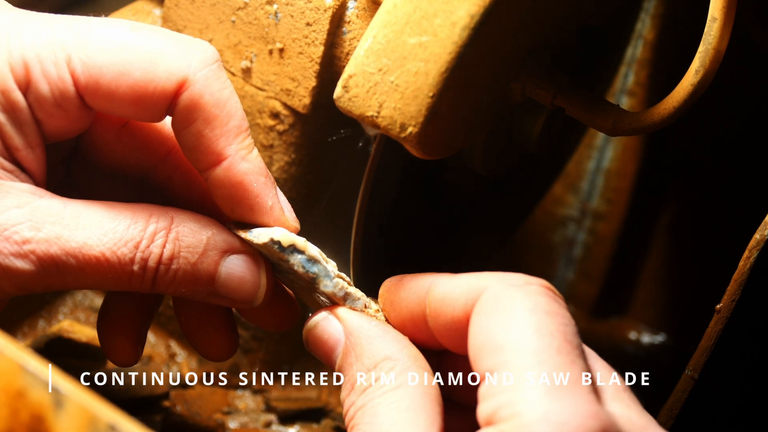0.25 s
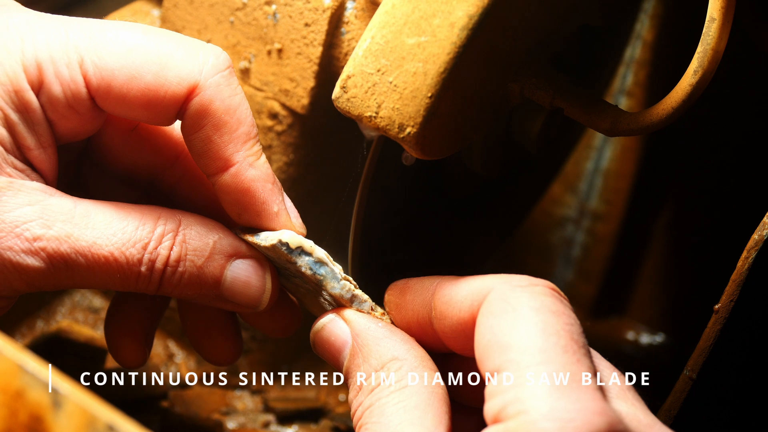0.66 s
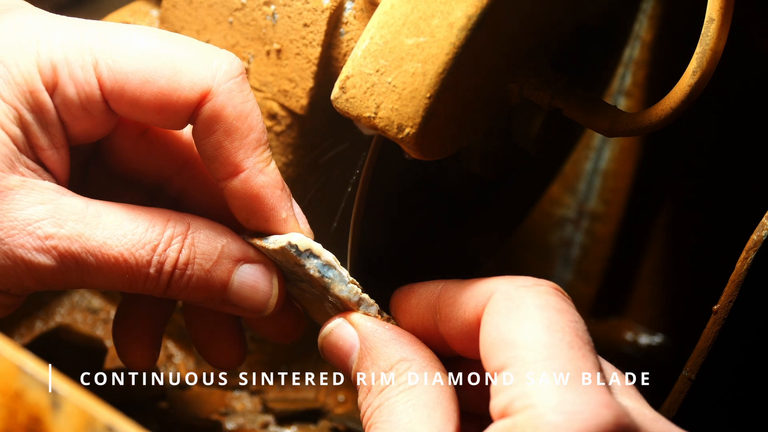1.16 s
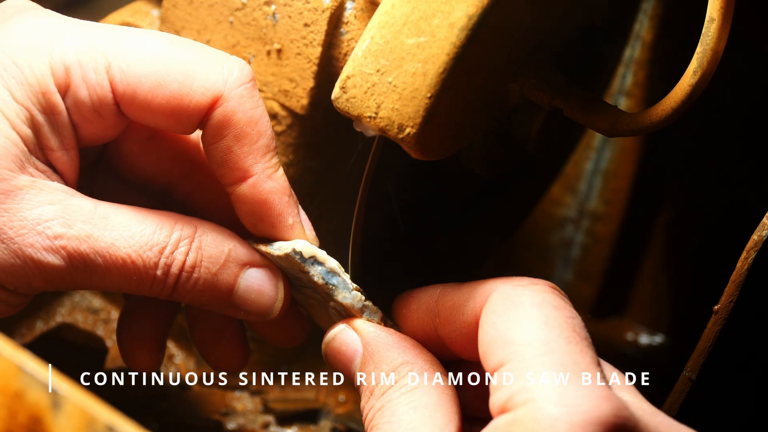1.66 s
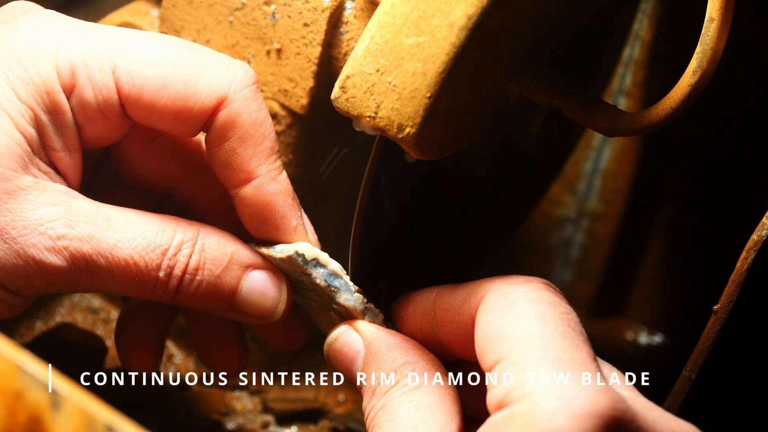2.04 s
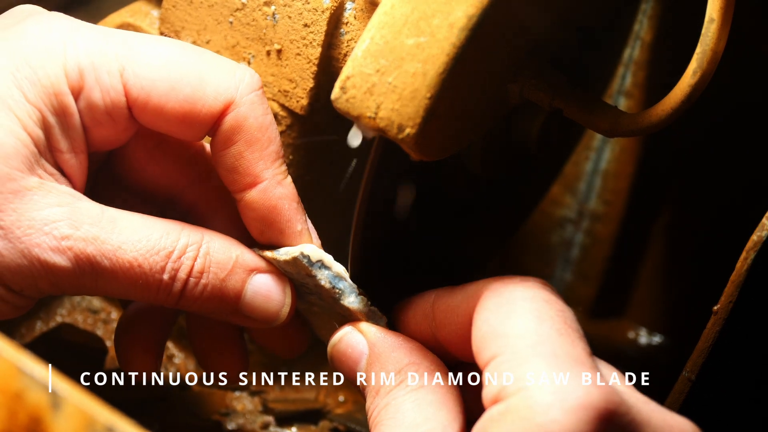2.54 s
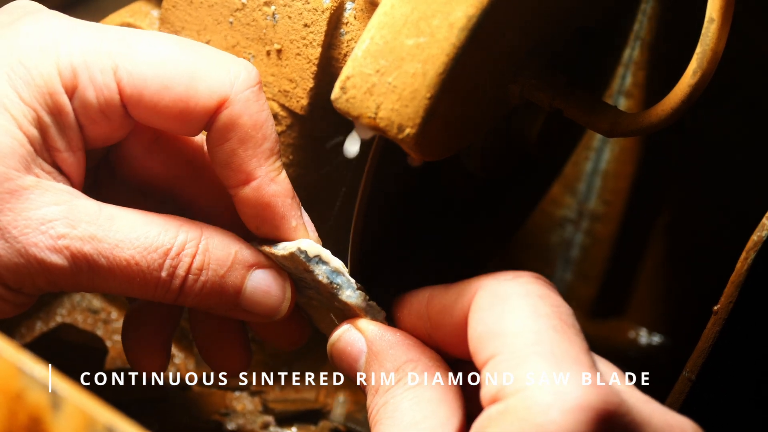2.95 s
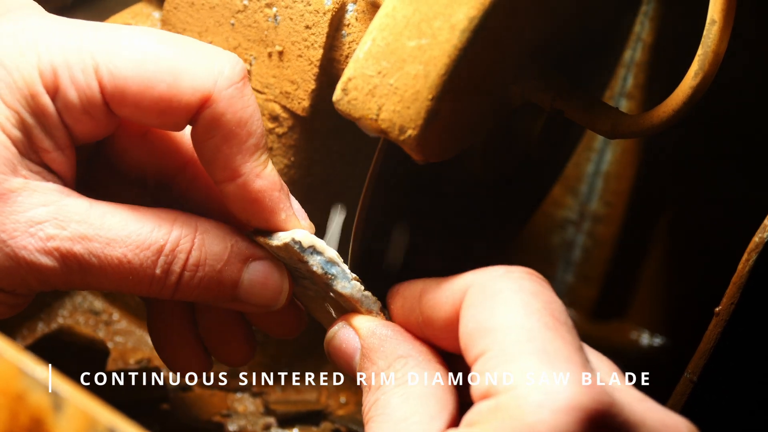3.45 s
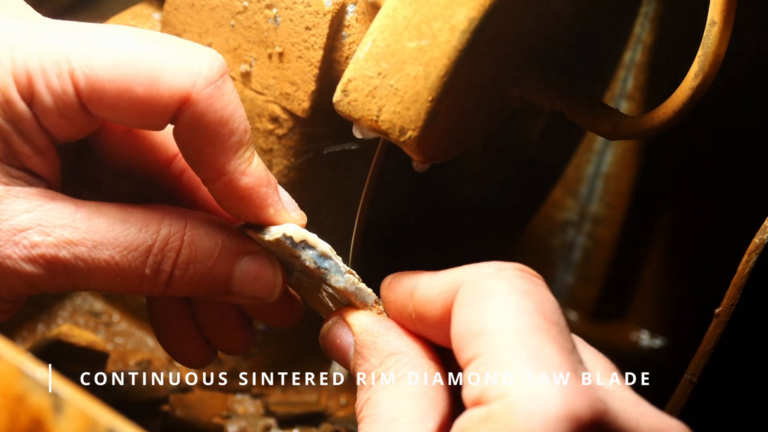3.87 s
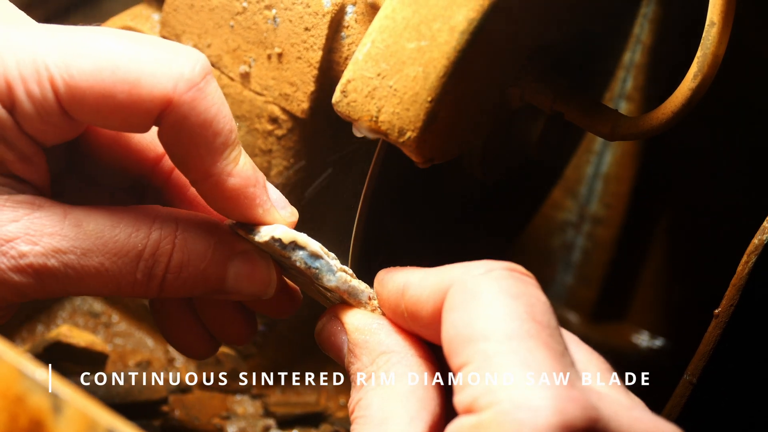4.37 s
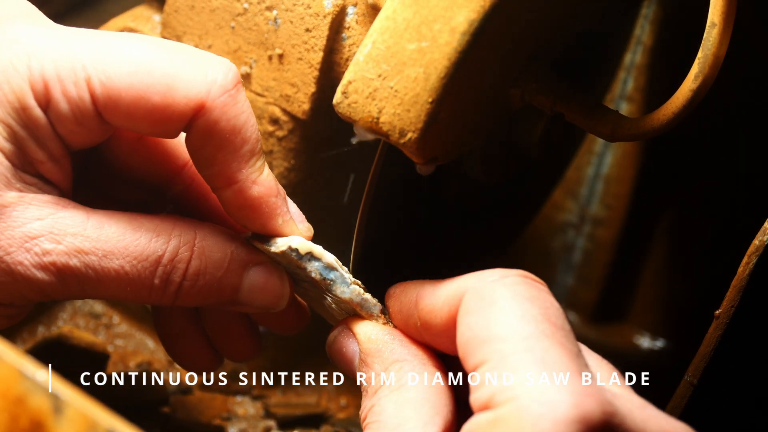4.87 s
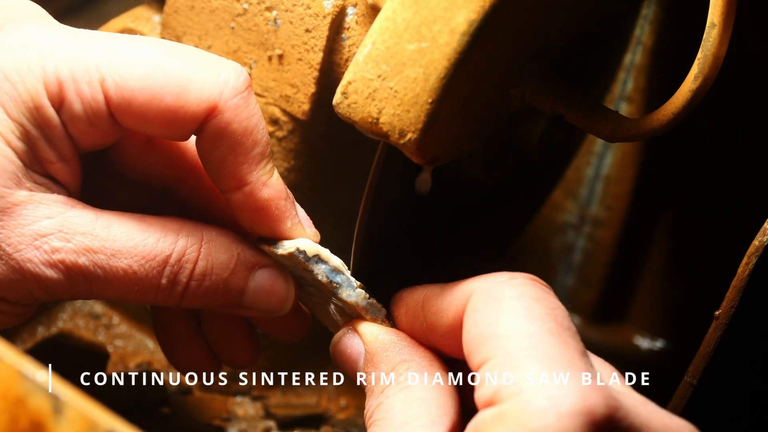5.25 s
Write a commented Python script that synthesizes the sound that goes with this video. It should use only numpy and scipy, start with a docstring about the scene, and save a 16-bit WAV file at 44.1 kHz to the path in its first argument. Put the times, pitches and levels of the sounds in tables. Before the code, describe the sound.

Close, continuous gritty grinding of a wet saw blade cutting stone, with short high squeals and chattering tones.

```python
"""A diamond saw grinds a small hand-held stone, close to a pair of microphones in a small workshop.
The wet rim turns about 79 times a second; its grit scrapes a slowly wearing pattern each turn and loose
chips add fresh hiss. A harder feed is louder and brighter. In spells a blade mode sings, or the stone
bounces and chatters at multiples of the shaft speed; the rim squeals as it bites, and later the
skipping stone knocks the blade. Motor hum and room rumble lie underneath."""
import sys
import numpy as np
from scipy import signal
from scipy.fft import rfft, irfft
from scipy.io import wavfile
from scipy.ndimage import uniform_filter1d, map_coordinates

SR = 44100
rng = np.random.default_rng(int(sys.argv[2]) if len(sys.argv) > 2 else 0)


def unload_audio(sound):
    """Save the sound as a 16-bit wav file, at the path given as the first command line argument."""
    columns = np.transpose(np.atleast_2d(sound))
    # keep every value between -1 and 1, then stretch to whole-number steps
    steps = np.round(np.clip(columns, -1, 1) * 32767)
    wavfile.write(sys.argv[1], SR, steps.astype(np.int16))


N = 242991
TIME = np.arange(N) / SR
FREQ = np.maximum(np.arange(N // 2 + 1) * SR / N, 1)

# Borders in Hz between the saw's five bands: bench and guard, blade bending, rasp, rim screech, hiss.
BAND_EDGES_HZ = [1420, 2360, 4850, 7180]


def undb(db):
    """Decibels to gain."""
    return 10 ** (np.asarray(db) / 20)


def unit(x):
    """Scale to rms 1."""
    return x / np.sqrt(np.mean(x ** 2))


def steady(x):
    """Scale to rms 1 over every tenth of a second, keeping the fast grain."""
    return x / np.sqrt(uniform_filter1d(x ** 2, size=SR // 10))


def curve(points):
    """One value per sample from (seconds, value) points."""
    return np.interp(TIME, *np.transpose(points))


def colour(points):
    """Gain at every frequency from (Hz, dB) points."""
    hz, db = np.transpose(points)
    return undb(np.interp(np.log(FREQ), np.log(hz), db))


def shape(x, gain):
    """Filter by a gain per frequency."""
    return irfft(rfft(x) * gain, N)


def walk(rate_hz):
    """Smooth random drift of rms 1, reaching up to about rate_hz."""
    return unit(shape(rng.standard_normal(N), np.exp(-(FREQ / rate_hz) ** 2)))


def rim_grit(turns, life_turns, sign=1):
    """Grit passes the stone each turn and wears into a new pattern; a negative sign flips it each turn."""
    cells = 560
    kept = np.exp(-1 / life_turns)
    carry = sign * kept
    grit = rng.standard_normal((int(turns[-1]) + 2, cells))
    worn, _ = signal.lfilter([np.sqrt(1 - kept ** 2)], [1, -carry], grit[1:], axis=0, zi=carry * grit[:1])
    return unit(map_coordinates(worn.ravel(), [turns * cells], order=3, mode="nearest"))


def cutting_force(turns, repeat, life_turns, wobble, flutter_db):
    """Rim grit and fresh chips push on the stone, pulsing once a turn as the blade runs out of true."""
    # Each row: time in seconds, share of the pattern that flips on alternate turns as the stone rocks.
    rocking = [(0, 0.05), (2.2, 0), (2.55, 0.27), (2.85, 0.18), (3.2, 0), (4.6, 0.03), (5.5, 0.22)]
    rock = curve(rocking)
    spot = turns + 0.00036 * walk(25)  # the point of contact trembles along the rim
    pattern = np.sqrt(1 - rock) * rim_grit(spot, life_turns)
    pattern += np.sqrt(rock) * rim_grit(spot, life_turns, sign=-0.98)
    force = np.sqrt(repeat) * pattern + np.sqrt(1 - repeat) * rng.standard_normal(N)
    # the high spot never presses twice alike, and creeps round the rim as the stone shifts
    depth = wobble * (1 + 0.5 * walk(35))
    press = 1 + depth * np.cos(2 * np.pi * turns + walk(3.2))
    return force * press * undb(flutter_db * walk(42))


def saw_response():
    """Stone, blade and guard resonate above a broad scrape, with gaps where neighbouring modes cancel."""
    # Each row: frequency in Hz, gain of the broad scrape in dB.
    scrape = [(30, -78), (85, -70), (150, -35.5), (320, -37), (400, -13), (500, -12.5), (700, -6),
              (1350, -9.5), (1650, -5.5), (2500, -11), (3800, -5.5), (4750, -9.5), (6400, -7), (9300, -13),
              (12300, -14), (15000, -23.5)]
    # Each row of both: centre in Hz, width in Hz, gain in dB.
    modes = [(855, 79, -5), (1126, 37, -6.5), (1883, 60, -1.5), (2680, 41, -4), (2980, 34, -11),
             (3556, 370, -2.5), (4360, 130, -11), (5200, 65, -7.5), (5760, 79, -4), (6155, 160, -2),
             (6480, 85, 0.5), (6870, 105, -2), (7860, 100, -9), (8510, 260, -4.5), (8950, 120, -7),
             (9210, 180, -1.5), (9670, 250, -4.5), (9870, 180, -2.5), (10100, 150, -10), (10770, 220, -8.5),
             (11750, 170, -11.5), (12800, 170, -8.5), (13800, 170, -11.5)]
    gaps = [(1380, 47, -2.5), (2430, 270, -2), (2850, 62, -2), (4840, 125, -3), (12570, 210, -5)]
    power = colour(scrape) ** 2
    bass_loss = 1 + (380 / FREQ) ** 8  # small parts radiate almost no bass
    for hz, width, db in modes:
        detuning = (FREQ / hz - hz / FREQ) * hz / width
        power += undb(db) ** 2 / (1 + detuning ** 2) / bass_loss
    gaps_db = sum(db * np.exp(-((FREQ - hz) / width) ** 2) for hz, width, db in gaps)
    return np.sqrt(power) * undb(gaps_db)


def grinding(turns, repeat, force, flicker_db):
    """The cutting force rings the saw in five bands; the brighter ones gain most as the feed grows."""
    # Each row: time in seconds, how hard the hand feeds the stone in dB.
    feed = [(0.0, -45.5), (0.1, -40), (0.33, -36.5), (0.66, -36), (0.82, -35), (1.41, -35), (1.67, -32.5),
            (1.81, -35.5), (2.17, -34.5), (2.26, -36), (2.86, -35), (2.94, -37), (3.055, -36.5),
            (3.085, -38.5), (3.165, -39), (3.185, -36), (3.27, -36.5), (3.54, -33.5), (3.8, -35.5),
            (4.01, -38), (4.58, -38.5), (4.7, -36.5), (5.0, -37), (5.45, -40.5)]
    # Each row: time in seconds, level of bench and guard in dB before bench_lift_db is added.
    bench = [(0, -59), (0.45, -55), (1.2, -54.5), (1.5, -51.5), (2.0, -54), (2.75, -53), (3.3, -54),
             (4.2, -58.5), (5.0, -53), (5.5, -54.5)]
    # The four upper bands. Each row: level in dB at the usual feed, dB gained per dB of feed.
    blade_bands = [(-46, 0.5), (-43.5, 0.71), (-40.5, 1.0), (-38.5, 1.12)]
    usual_feed_db, bench_lift_db, spray_share = -35, 6, 0.13
    # heavy parts follow the rim most faithfully, the hiss of water and slurry least
    heavy = cutting_force(turns, repeat + 0.067, life_turns=17.2, wobble=0.035, flutter_db=0.5)
    wet = np.sqrt(1 - spray_share) * force + np.sqrt(spray_share) * rng.standard_normal(N)
    highpass = [1] + [1 / (1 + (hz / FREQ) ** 20) for hz in BAND_EDGES_HZ] + [0]
    feed_db = curve(feed) - usual_feed_db
    levels = [curve(bench) + bench_lift_db] + [db + growth * feed_db for db, growth in blade_bands]
    response, out = saw_response(), 0
    for k, (drive, db) in enumerate(zip([heavy, force, force, force, wet], levels)):
        band = steady(shape(drive, response * (highpass[k] - highpass[k + 1])))
        # each part takes up the force a little differently as the stone shifts
        out += band * undb(db + flicker_db * walk(14.6))
    return out


def treble_shimmer(x, depth_db, span_hz, hold_s):
    """Narrow patches of the treble swell and fade on their own."""
    hz, s, bands = signal.stft(x, SR, nperseg=1024)
    grid = np.meshgrid(hz / span_hz, s / hold_s, indexing="ij")
    patches = map_coordinates(rng.standard_normal((400, 200)), grid, order=3, mode="mirror")
    gain = undb(depth_db * patches * (hz > BAND_EDGES_HZ[1])[:, None])
    gain /= np.sqrt(np.mean(gain ** 2, axis=1, keepdims=True))
    return signal.istft(bands * gain, SR, nperseg=1024)[1][:N]


def blade_singing(force, fade_s):
    """Friction feeds a blade mode for a while; it swells to a steady size and dies away."""
    # Each row: start and end in seconds, pitch in Hz, width in Hz, held level in dB.
    spells = [ (0.0, 1.394, 1850, 265, -52.5), (0.046, 1.473, 11880, 130, -53), (0.08, 0.7, 6280, 400, -53),
              (0.083, 0.67, 3460, 110, -50.5), (0.043, 1.013, 4240, 129.9, -53),
              (0.676, 1, 3620, 170, -45.5), (.8, 1.8, 6600, 120, -52), (1.37, 1.749, 5150, 60, -49.5),
              (1.4, 2.3, 10650, 900, -53), (1.53, 1.793, 3530, 200, -52), (1.6, 2.26, 9600, 700, -47.5),
              (1.696, 2.96, 8560, 500, -51), (1.75, 2.076, 1663, 25.2, -50.5), (1.86, 2.457, 5540, 51, -55),
              (1.987, 2.226, 3480, 72, -43.5), (1.99, 2.35, 3020, 97.2, -57),
              (2.15, 2.905, 6570, 260, -52.5), (3.185, 3.738, 3386, 42.3, -50.5),
              (3.14, 3.89, 5745, 28, -53), (3.398, 3.857, 12920, 238, -56.5), (3.306, 3.8, 7290, 120, -52),
              (3.3, 4.348, 1490, 207.1, -51), (3.55, 3.982, 3670, 252, -55), (3.656, 3.954, 2680, 60, -55),
              (3.91, 4.65, 9260, 130, -57), (4.37, 4.816, 3810, 171, -54), (4.42, 4.849, 3580, 200, -54),
              (4.6, 5.7, 1760, 601, -57.5), (4.553, 4.9, 6150, 422, -43), (4.89, 5.357, 3385, 110, -51.5),
              (4.805, 5.594, 2290, 326, -59)]
    out = np.zeros(N)
    for start, end, hz, width, db in spells:
        now = (TIME > start) & (TIME < end)
        pole = np.exp((2j * np.pi * hz - np.pi * width) / SR)
        ring = signal.lfilter([1], np.poly([pole, pole]), force[now])
        ring /= np.sqrt(uniform_filter1d(np.abs(ring) ** 2, size=1500))
        to_edge_s = np.minimum(TIME[now] - start, end - TIME[now])
        out[now] += undb(db) * np.minimum(to_edge_s / fade_s, 1) * unit(ring.real)
    return out


def motor_hum(turns, waver_db, magnet_db):
    """The drive hums on multiples of the shaft speed, with a magnetic tone at eight times the mains."""
    # Each row: multiple of the shaft speed, level in dB.
    harmonics = [(2, -92.5), (3, -94.5), (6, -82.5)]
    mains_hz, hum = 50, 0
    for order, db in harmonics:
        gain = undb(db + waver_db * walk(5.2))
        hum += gain * unit(np.sin(2 * np.pi * order * turns + 0.5 * walk(41)))
    magnet = unit(np.sin(2 * np.pi * 8 * mains_hz * TIME) * undb(2 * walk(41)))
    return hum + undb(magnet_db) * magnet


def bounce_strength(tone_hz):
    """Each spell of bouncing lifts a chatter tone near the held stone's resonance, then lets it fall."""
    # Each row: start and end in seconds, resonance in Hz, relative peak level in dB.
    # A row sounds only if its end lies after its start.
    spells = [ (0.0, 0.26, 1850, -51.5), (0.05, 0.66, 804, -55.5), (0.233, 0.38, 1900, -42),
              (0.257, 0.3, 868, -56), (0.375, 0.72, 1910, -52), (0.399, 2.1, 515, -53),
              (0.502, 1.404, 1914, -53), (0.618, 2.06, 807, -47), (0.732, 0.89, 1860, -61),
              (0.992, 1.38, 1890, -45.5), (1.29, 1.2, 834, -49), (1.33, 1.5, 1895, -53),
              (1.442, 1.5, 830, -52), (1.48, 1.58, 1870, -46), (1.647, 1.71, 1870, -42),
              (1.728, 1.815, 1885, -48), (1.82, 1.6, 1910, -55), (1.9, 2.6, 1950, -51.5),
              (1.942, 2.11, 1877, -46.5), (2.0, 2.35, 553, -56.5), (2.048, 2.4, 1265, -52),
              (2.072, 2.26, 910, -50), (2.2, 2.5, 1107, -57), (2.23, 2.53, 1910, -49.5),
              (2.27, 2.5, 830, -55), (2.248, 2.6, 710, -59), (2.55, 2.93, 1780, -53), (2.66, 3.2, 700, -52),
              (2.69, 2.75, 785, -47), (2.722, 3.04, 555, -52.5), (2.738, 3.24, 1264, -50),
              (2.99, 3.34, 1088, -43), (3.048, 3.3, 790, -46.5), (3.1, 3.6, 870, -46),
              (3.145, 3.31, 1860, -44.5), (3.24, 3.8, 1110, -50), (3.298, 3.513, 1862, -42),
              (3.428, 3.732, 866, -48.5), (3.5, 3.925, 1790, -48.5), (3.555, 3.5, 1885, -44),
              (3.66, 4, 1850, -47), (3.668, 3.904, 844, -43.5), (3.722, 4.7, 1101, -56),
              (3.928, 4, 940, -52), (3.95, 4.05, 1870, -45), (3.978, 4.18, 830, -46.5),
              (4.04, 4.193, 1860, -49), (4.153, 4.45, 870, -44), (4.17, 4.335, 1890, -45.5),
              (4.1, 4.4, 825, -45.5), (4.388, 4.62, 850, -39.5), (4.42, 4.56, 1920, -50),
              (4.472, 4.83, 870, -38.5), (4.5, 4.9, 1580, -48.5), (4.501, 4.912, 820, -50),
              (4.55, 5.7, 696, -52), (4.58, 4.85, 1880, -57), (4.75, 5.1, 1120, -49.5),
              (4.75, 6.2, 1630, -58), (4.758, 5.1, 854, -47.5), (4.758, 5.4, 1260, -55),
              (4.822, 5.035, 1856, -46), (4.98, 5.33, 1101, -44.5), (5.04, 5.29, 1810, -49),
              (4.75, 6.2, 530, -58), (5.28, 5.7, 700, -55), (5.3, 5.6, 1110, -48),
              (5.297, 5.673, 990, -53.5), (5.358, 5.577, 1920, -44.5)]
    width_hz = 61.2
    power = np.zeros(N)
    for start, end, hz, db in spells:
        now = (TIME > start) & (TIME < end)
        arch = np.abs(np.sin(np.pi * (TIME[now] - start) / (end - start))) ** 0.75
        nearness = np.exp(-((tone_hz - hz) / width_hz) ** 2)
        power[now] += (undb(db) * arch * nearness) ** 2
    return np.sqrt(power)


def stone_chatter(turns, repeat, gain_db, waver, slip_cycles, scatter):
    """The stone bounces in step with the blade; its tones waver most while the contact is loose."""
    # Multiples of the shaft speed at which the stone can chatter.
    orders = [6, 7, 8, 9, 10, 11, 12, 14, 16, 20, 21, 22, 23, 24, 25]
    looseness = waver * np.sqrt(1 - repeat)
    shaft_hz = turns[-1] / TIME[-1]
    hardness = 1 + scatter * walk(49)  # no two bounces are equally hard
    out = 0
    for order in orders:
        swing = 1 + looseness * (walk(19) + 1j * walk(20))
        cycles = order * turns + rng.random() + slip_cycles * walk(3.8)  # the contact slips along the rim
        tone = unit(hardness * np.real(swing * np.exp(2j * np.pi * cycles)))
        out += bounce_strength(order * shaft_hz) * tone
    return undb(gain_db) * out


def room_rumble(level_db, swell_db):
    """Dull noise of the room and the belt drive."""
    # Each row: frequency in Hz, relative level in dB.
    spectrum = [(25, -12), (55, -22), (85, -30), (140, 6), (260, 3), (400, 15), (1000, -42)]
    noise = unit(shape(rng.standard_normal(N), colour(spectrum)))
    return noise * undb(level_db + swell_db * walk(8.5))


def rim_bites(width_hz, rise_s):
    """The rim squeals briefly where it catches on the stone."""
    # Each row: start in seconds, pitch in Hz, level at the crest in dB.
    squeals = [(0.3146, 6430, -36), (0.3674, 6260, -40), (0.4293, 6480, -42), (0.571, 9840, -36),
               (0.8189, 6460, -32), (0.88, 9600, -36.5), (1.0319, 6400, -32), (1.1078, 6550, -44),
               (1.1736, 6320, -37), (1.4132, 6500, -41), (1.5633, 6570, -39), (1.6671, 6340, -43),
               (1.72, 6560, -37), (2.4508, 6300, -43), (2.4991, 6600, -40), (2.7041, 6640, -41)]
    rasp, out = walk(width_hz), 0
    for start, hz, db in squeals:
        swell = np.exp(-((TIME - start - rise_s) / rise_s) ** 2)
        out += undb(db) * swell * unit(rasp * np.sin(2 * np.pi * hz * TIME))
    return out


def blade_knocks(ring_hz, rise_s):
    """The stone skips and knocks the blade into bending, then damps it within milliseconds."""
    # Each row: start in seconds, peak level in dB.
    knocks = [(2.816, -32.5), (3.728, -37), (3.742, -34), (3.779, -40), (3.792, -33), (3.805, -35),
              (3.843, -33)]
    out = 0
    for start, db in knocks:
        age = np.maximum(TIME - start, 0) / rise_s
        ring = np.sin(2 * np.pi * (ring_hz * TIME + rng.random()))
        out += undb(db) * age * np.exp(1 - age) * ring
    return out


def workshop(x, t60_s, first_echo_s):
    """The nearby walls answer differently at the left and right microphones."""
    # Each row: frequency in Hz, reflections against the direct sound in dB.
    walls = [(100, -20), (700, -14), (1300, -12), (2400, -11.5), (4400, -7.5), (8100, -15.5),
             (11000, -11.5), (14000, -4.5)]
    # Each row: frequency in Hz, left microphone minus right in dB.
    balance = [(380, 0.5), (1290, -1.5), (4400, -0.6), (8100, 0), (15000, .5)]
    echoes = rfft(rng.standard_normal(N) * undb(-60 * TIME / t60_s))
    echoes /= np.abs(echoes)  # flat in level, scattered in phase
    delay = np.exp(-2j * np.pi * FREQ * first_echo_s)
    side = shape(x, echoes * delay * colour(walls))
    lean = np.sqrt(colour(balance))
    return np.array([shape(x + side, lean), shape(x - side, 1 / lean)])


def scene():
    """The saw at work, as it reaches the two microphones; the turning shaft sets the pace."""
    # Each row: time in seconds, shaft speed in turns per second.
    shaft_speed = [(0.0, 79.53), (0.5, 79.41), (1.0, 79.32), (1.3, 79.28), (1.7, 79.15), (2.0, 79.09),
                   (2.25, 79.17), (2.55, 79.13), (2.85, 79.04), (3.2, 78.75), (3.65, 78.61), (4.1, 78.71),
                   (4.35, 78.61), (4.65, 78.33), (4.9, 78.54), (5.15, 78.63), (5.5, 78.82)]
    # Each row: time in seconds, base share of the scraping that repeats with the rim, from 0 to 1.
    repeat_share = [(0.0, 0.54), (0.5, 0.41), (1.0, 0.47), (1.3, 0.33), (1.7, 0.49), (2.0, 0.85),
                    (2.25, 0.78), (2.55, 0.78), (2.85, 0.82), (3.2, 0.7), (3.65, 0.71), (4.1, 0.7),
                    (4.35, 0.67), (4.65, 0.89), (4.9, 0.71), (5.15, 0.86), (5.5, 0.78)]
    turns = np.cumsum(curve(shaft_speed)) / SR
    repeat = curve(repeat_share)
    force = cutting_force(turns, repeat + 0.033, life_turns=13, wobble=0.048, flutter_db=0.34)
    saw = grinding(turns, repeat, force, flicker_db=0.75)
    saw = treble_shimmer(saw, depth_db=1.88, span_hz=139.5, hold_s=0.2141)
    saw += blade_singing(force, fade_s=0.14)
    saw += motor_hum(turns, waver_db=5.5, magnet_db=-63.5)
    saw += stone_chatter(turns, repeat, gain_db=0.77, waver=0.33, slip_cycles=0.063, scatter=0.067)
    saw += rim_bites(width_hz=220, rise_s=0.007)
    saw += blade_knocks(ring_hz=1864, rise_s=0.0016)
    rumble = room_rumble(level_db=-78, swell_db=1)
    return workshop(saw + rumble, t60_s=0.5, first_echo_s=0.02)


def record(dry):
    """The recorder cuts the highest treble steeply."""
    top_hz = 15400
    return signal.sosfilt(signal.ellip(12, 0.1, 80, top_hz, fs=SR, output="sos"), dry)


dry = scene()
out = record(dry)
unload_audio(out)
```